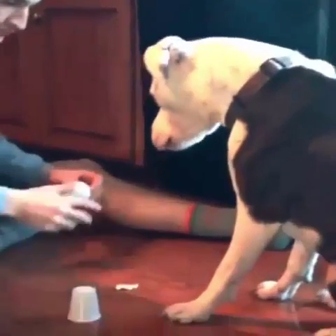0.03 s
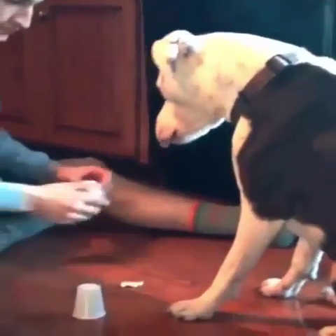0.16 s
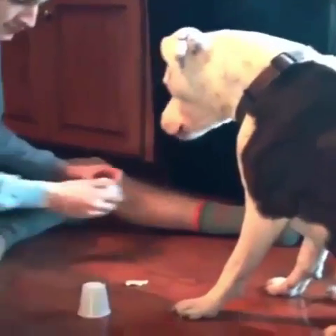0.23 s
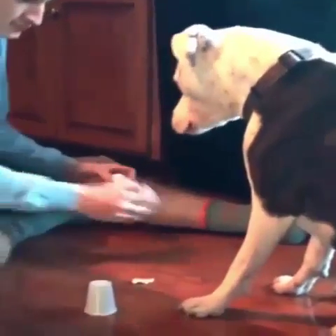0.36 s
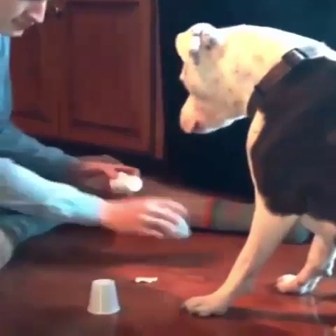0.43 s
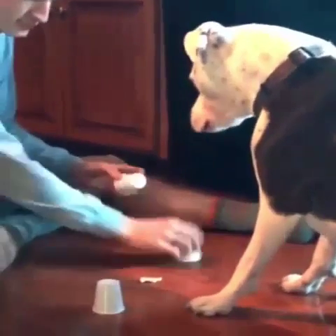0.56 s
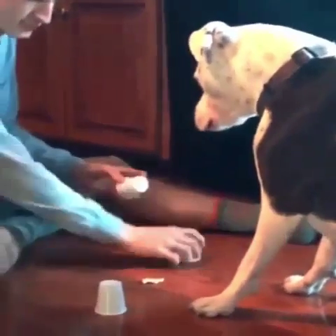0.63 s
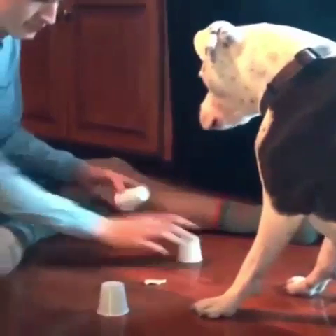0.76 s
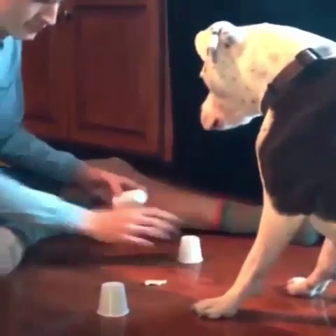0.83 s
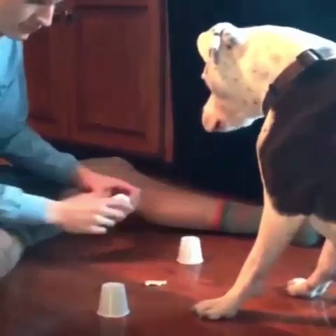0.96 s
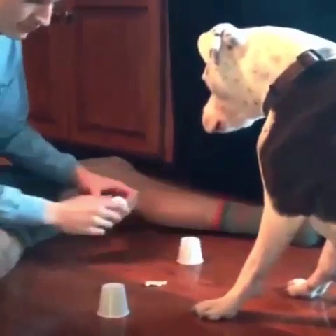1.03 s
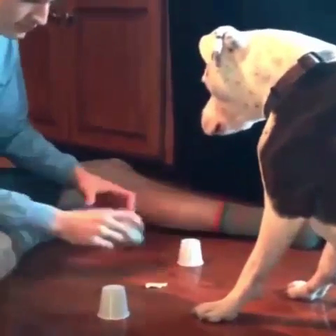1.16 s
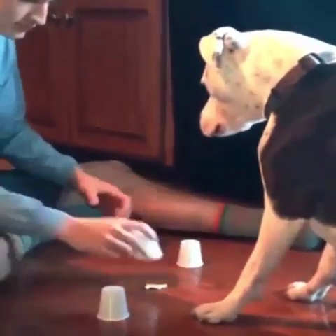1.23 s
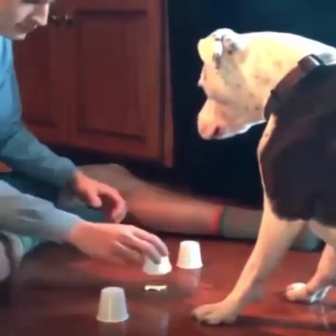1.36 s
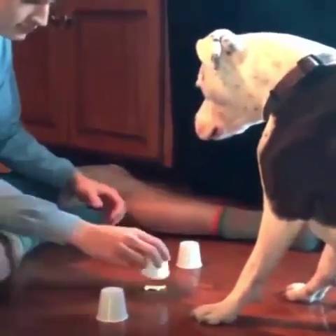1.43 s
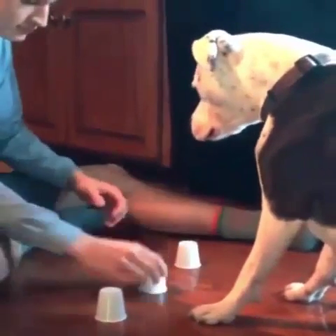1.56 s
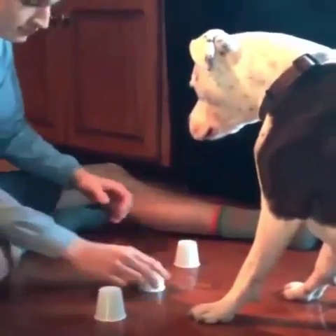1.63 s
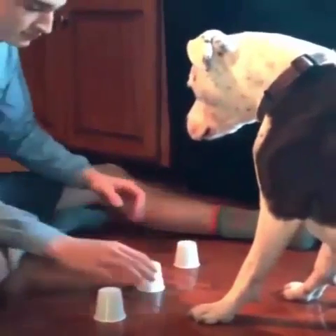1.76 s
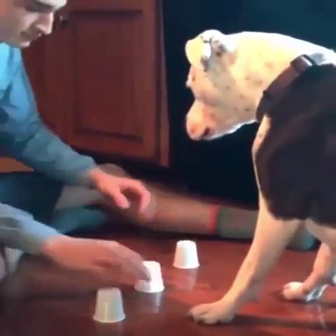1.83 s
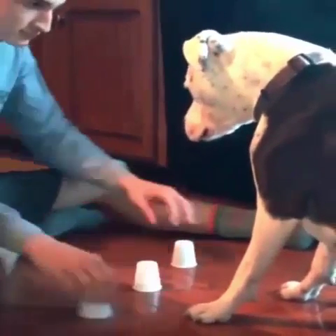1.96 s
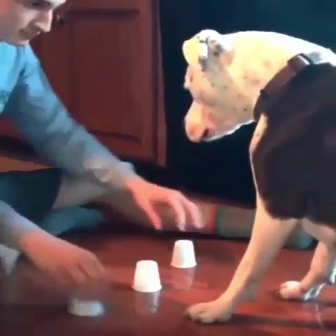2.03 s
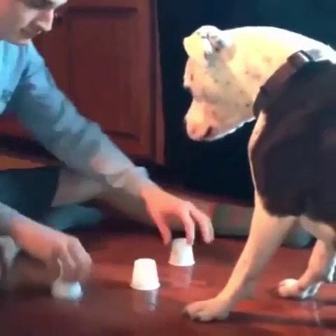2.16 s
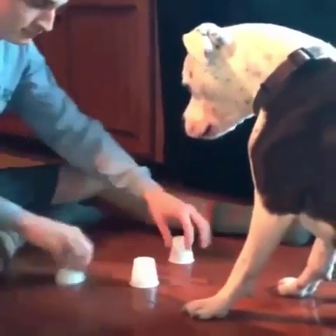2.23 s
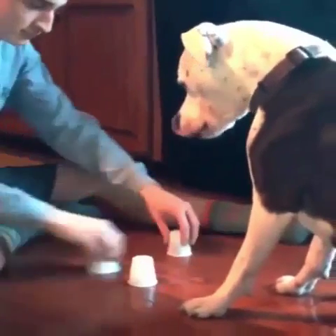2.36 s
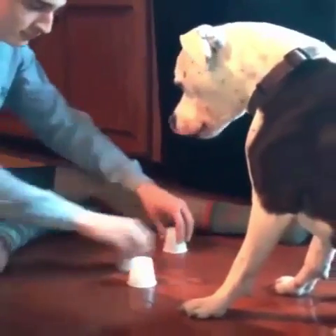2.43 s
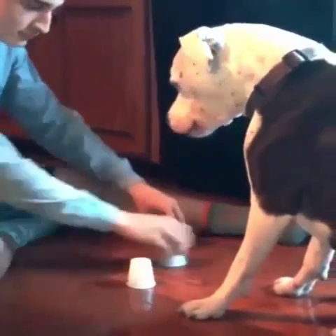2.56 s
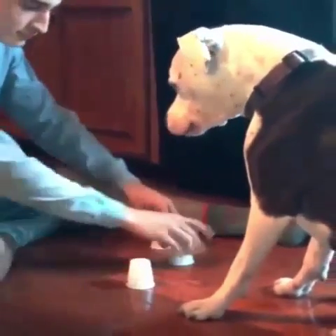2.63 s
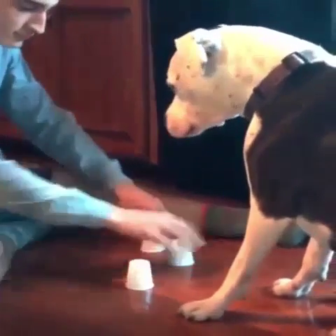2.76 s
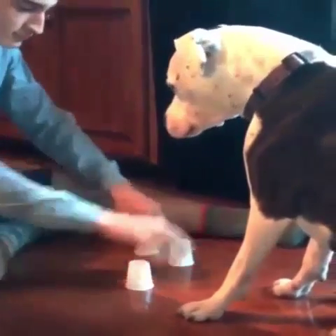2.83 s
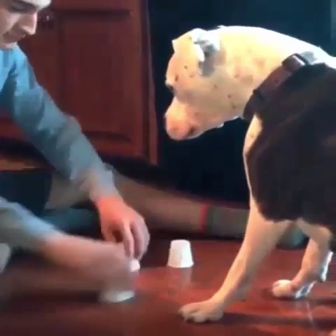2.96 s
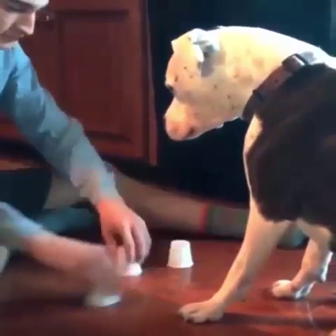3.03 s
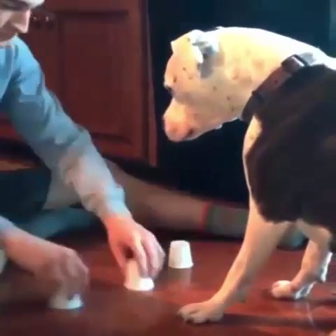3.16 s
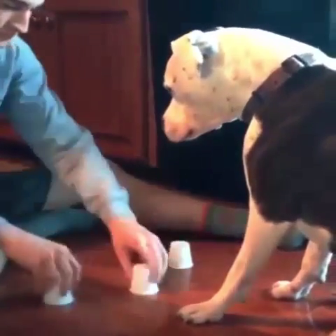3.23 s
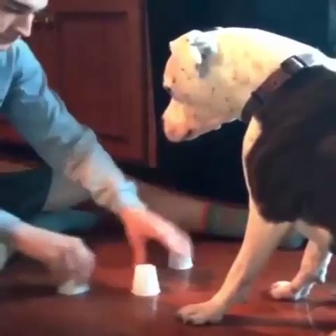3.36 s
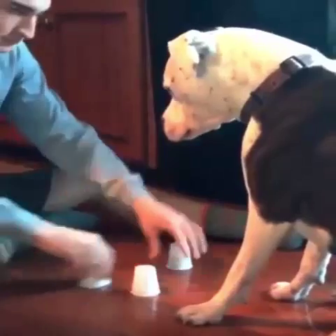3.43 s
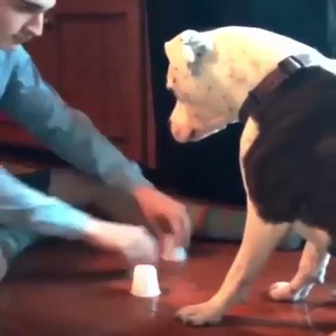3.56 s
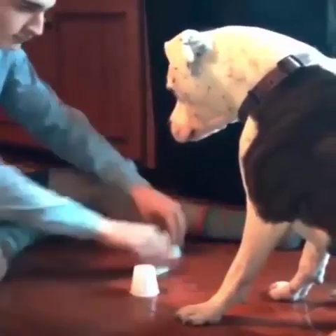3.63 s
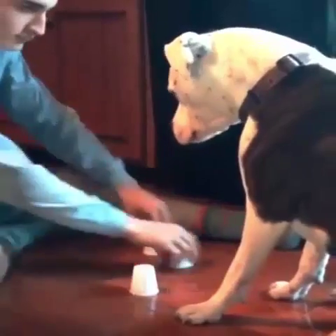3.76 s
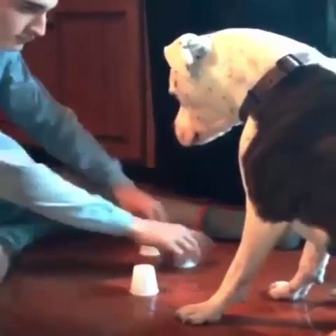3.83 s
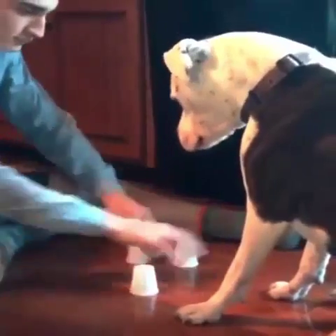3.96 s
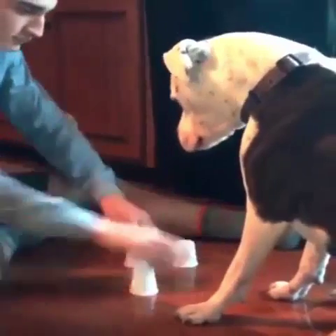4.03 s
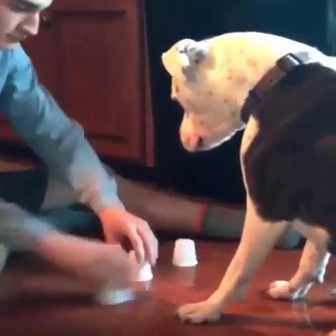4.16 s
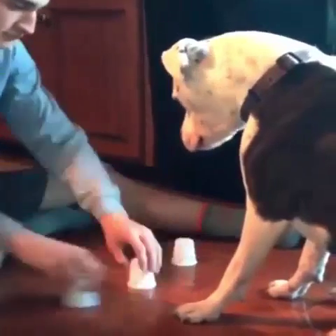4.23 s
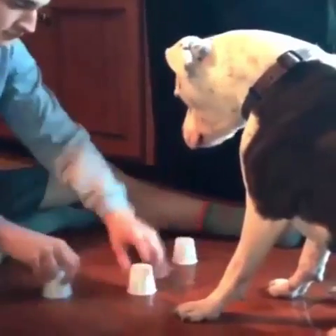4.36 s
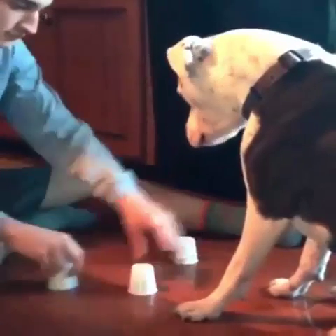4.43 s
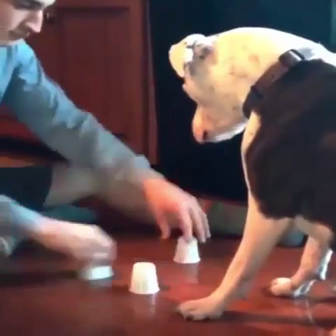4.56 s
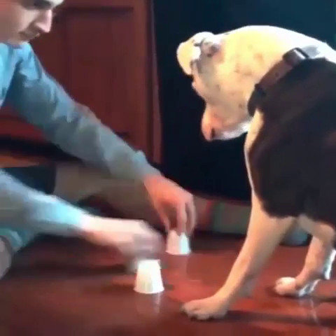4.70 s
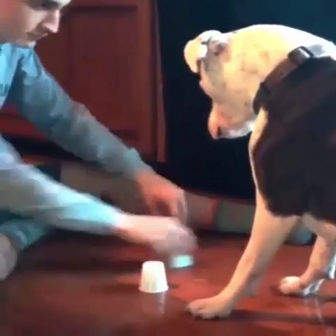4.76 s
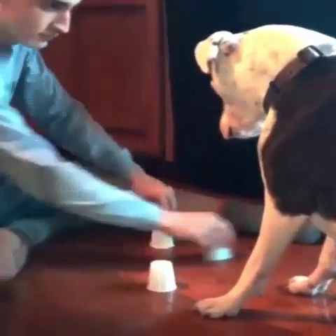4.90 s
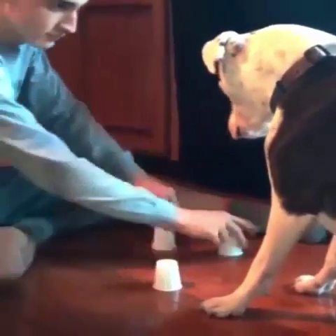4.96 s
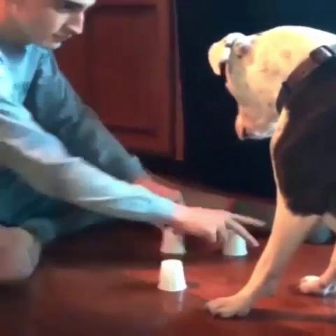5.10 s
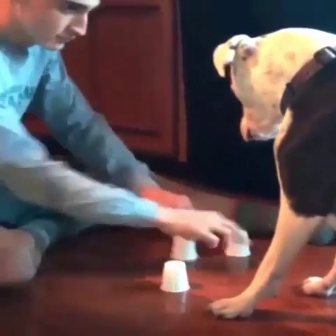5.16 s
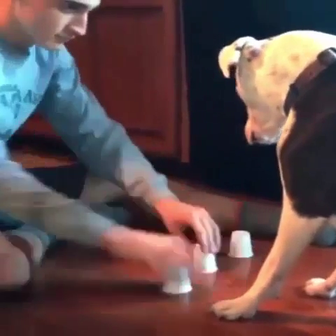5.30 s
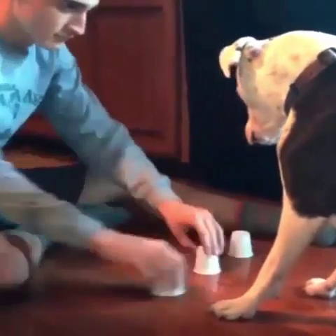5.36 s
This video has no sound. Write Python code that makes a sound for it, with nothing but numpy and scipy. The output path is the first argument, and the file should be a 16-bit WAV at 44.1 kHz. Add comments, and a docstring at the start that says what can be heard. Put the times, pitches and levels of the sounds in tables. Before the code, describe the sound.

Soft sleeve and finger rustles open over a faint hum and hiss in a kitchen with a short echo. At about 0.7 seconds a small plastic cup lands upside down on a hardwood floor with a hollow clack and rattles quickly to rest. Another lands the same way at 1.6 seconds. From 2 seconds the cups are shuffled by hand: quick, gritty scrapes swell and fade one after another, mixed with light, irregular rim knocks that ring briefly. A tipping cup gives a tiny hoot at about 2.2 and 2.6 seconds, the second together with a third rattling landing. The knocks bunch up around 3.6 and 4.1 seconds, and the sliding and tapping continue until about 5.4 seconds. The sound cuts out completely for about a tenth of a second near 0.6, 1.8, 3.1 and 4.3 seconds.

```python
"""Small plastic cups are set upside down on a hardwood floor, then shuffled about by hand. Each rim lands with
a chattering clack, and the cup wall and the air inside ring briefly after it. Pushed along, the rims stick and
slip on the grain in a gritty scrape; twice a tipping cup hoots. The sound opens on the fading tail of an
earlier one; sleeves and fingers rustle, and a kitchen adds its short echo. A faint hum and hiss lie underneath;
four times the sound cuts out altogether."""
import sys
import numpy as np
from scipy import signal
from scipy.fft import rfft, irfft, next_fast_len
from scipy.io import wavfile
from scipy.ndimage import uniform_filter1d

SR = 44100
rng = np.random.default_rng(int(sys.argv[2]) if len(sys.argv) > 2 else 0)


def persist_wave(psi):
    """Save psi, clipped to +-1, as 16-bit WAV."""
    counts = np.round(np.clip(psi, -1, 1) * 32767).astype(np.int16)
    wavfile.write(sys.argv[1], SR, np.atleast_2d(counts).T)


N = 238845
T = np.arange(N) / SR

# EQ curve of the room's hiss: (frequency [Hz], gain [dB])
HISS_EQ = [(25, -39.5), (55, -9), (115, -4), (180, -6.5), (350, 0.5), (460, -10.5), (620, -9), (750, -14),
           (1500, -17.5), (2800, -18.5), (5000, -16.5), (8000, -17), (11800, -19), (12500, -31.5)]
# partials of an appliance's hum: (frequency [Hz], rms level [dB])
HUM_PARTIALS = [(323.0, -76.5), (393.0, -65), (1093, -77.5), (1814, -85.5)]
# the fading tail of an earlier sound at the start, then sleeve and finger sounds: (time [s], level before trim
# [dB], length [s], centre [Hz], width [Hz])
SWELLS = [(-.04, -45.5, 0.088, 1290, 895), (-.03, -59.5, 0.16, 3500, 3450),
          (0.232, -52.5, .18, 6260, 7150), (0.573, -51.5, 0.011, 1070, 2140),
          (1.024, -52, 0.033, 604, 108), (1.017, -60, 0.037, 6030, 8000), (1.323, -61, 0.017, 630, 109)]
# decay of the kitchen's reverb: (frequency [Hz], t60 [s])
KITCHEN_DECAY = [(150, 0.35), (500, 0.28), (1500, 0.3), (4000, 0.29), (8000, 0.28), (14000, 0.45)]
# hard mutes: (start [s], end [s])
DROPOUTS = [(.592, .685), (1.83, 1.914), (3.047, 3.146), (4.3, 4.4)]
# a cup lands and rattles to rest; thud to hollow are relative to the level, before trims:
# (time [s], level [dB], thud [dB], treble [dB], wall ring [dB], hollow [dB],
# hollow note on the landing side [Hz], on the far side [Hz], settling time [s], fade over it [dB])
SET_DOWNS = [(0.687, -9.5, 0.5, 6.2, -13, 1.3, 1532, 953, 0.095, -17),
             (1.6007, -9.5, -4, 0.73, -1.5, 0.23, 562, 1101, .11, -21),
             (2.555, -11.5, -1, 10.9, -24.5, 0.11, 924, 1000, .095, -21.5)]
# single rim knocks in the shuffle; thud to hollow are relative to the level, before trims:
# (time [s], level [dB], thud [dB], treble [dB], wall ring [dB], hollow [dB], hollow note [Hz])
RIM_KNOCKS = [(2.064, -35.5, -16, -12, -15, 13.5, 1960), (2.087, -18, -8, 11, -15, -1.5, 920),
              (2.189, -26, 5, -8, -12, 5, 1950), (2.247, -17.5, -15, -3, -17, -12, 910),
              (2.719, -38.5, -2, -3, -15, 9, 875), (2.884, -44, -12, 8, 6, 8, 1970),
              (2.9502, -21.5, -19, 5.5, 12, 4.5, 632), (2.991, -19, 12, 13, -31, -3, 633),
              (3.168, -20.5, -2, 0, 4, -9, 965), (3.221, -23.5, 13, 35, -12, -2, 1010),
              (3.274, -31, 8, -2, 11, 11.5, 650), (3.374, -22.5, -3, 3, -21, -21, 1590),
              (3.591, -21, -1.5, -7, 0.5, -2, 910), (3.615, -19, 2, 0, -12, 2.5, 877),
              (3.708, -14.5, 11, -5, -7, -6, 597), (3.752, -22, 8, 0, 5.5, 1.5, 365),
              (4.041, -30, -3, -8, -4, 8, 923), (4.092, -15, -20, -10, -21, 5.5, 866),
              (4.102, -27, -5, -5, -7, 12.5, 2740), (4.131, -22.5, -6, 17, -18, -15, 1170),
              (4.14, -16, 1, 0, -14.5, 6.5, 917), (4.157, -18.5, 3.5, -10, -1, -0.5, 2750),
              (4.172, -19.5, 10, 14, -12, -9, 2660), (4.211, -17.5, 7, -18, -26, -2, 634),
              (4.288, -30, -10, 0, -11, 9.5, 1423), (4.468, -29.5, -7, -4, -12, 9, 1104),
              (4.49, -24.5, 3, -13, -20, -4, 1100), (4.706, -19.5, -3, -6.5, 0.5, 1, 1500),
              (4.724, -25.5, 17, -16, -10, 6, 1330), (4.813, -23, 7.5, -21, -15, 7.5, 487),
              (4.844, -14.5, -8, 0.5, -19, 1.5, 733), (4.953, -21, 4, 0.5, -9, -14, 980),
              (5.088, -33, 18, 10, -15, 2, 595), (5.179, -15.5, 1, -6.5, -12, -4, 996),
              (5.232, -29.5, 15, -15, -3, 11, 1550), (5.368, -25, -1, 4, -22, -19, 1430)]
# EQ curve of a clack: (frequency [Hz], gain [dB])
CLACK_EQ = [(30, -23), (90, -28), (170, -15.5), (270, -10), (400, -1.5), (600, 1.5), (1100, 1.5),
            (1700, 1.5), (2500, -4.5), (3400, -5.5), (4600, -13), (7500, -17), (11000, -24.5),
            (13000, -34.5)]
# resonances and dead spots of a rim on the boards: (centre [Hz], width [Hz], gain [dB])
BOARD_BANDS = [(366, 99, 8), (446, 163, -6.5), (632, 110, 0.5), (864, 11, 2), (1010, 38, -1),
               (1440, 44, 1.5), (2690, 100, 1), (2810, 53, -4.5), (3670, 130, 1), (6450, 290, 3)]
# modes of the cup wall: (frequency [Hz], level [dB], t60 [s])
CUP_MODES = [(1788.3, 1, 0.092), (2250, -38, .03), (3075, -11.5, 0.075), (3693, -12, 0.047),
             (4270, -30, 0.027), (4600, -25, 0.092), (6760, -26.5, 0.045), (6700, -22, 0.033)]
# cups creep under the hands between pushes; the last three are relative to the scrape, all before trims:
# (start [s], end [s], scrape [dB], rumble [dB], fizz [dB], wall ring [dB])
CREEP = (2, 5.6, -55.5, -3, -4, -15)
# a hand pushes a cup along, levels as in CREEP:
# (time of top speed [s], rise [s], fall [s], scrape [dB], rumble [dB], fizz [dB], wall ring [dB])
PUSHES = [(2.085, 0.031, 0.042, -27.5, -17, -11, -2), (2.243, 0.11, 0.14, -27, -16, -8, -27),
          (2.41, 0.11, 0.11, -33, -15, -6.5, -14), (2.604, 0.15, 0.063, -27, -11, -11, -10),
          (2.915, 0.069, 0.083, -41, -15, -9, 1), (2.99, 0.087, 0.058, -30.5, -13.5, -5, 5.5),
          (3.168, 0.085, 0.09, -32.5, -13, -6, 3.5), (3.265, 0.09, 0.17, -36, -8, -6, -1.5),
          (3.399, 0.065, 0.05, -33.5, -11.5, -10.5, -20), (3.46, 0.098, .08, -55, -17, 7, -18.5),
          (3.555, 0.098, 0.069, -36, -19, -7.5, -9), (3.624, 0.097, 0.097, -34, -12, -8, -2),
          (3.767, 0.096, 0.035, -29, -13, -9, 4), (3.865, 0.032, 0.027, -53.5, 7, -14, -9),
          (4.105, 0.085, 0.081, -29, -10, -10, -7), (4.195, 0.087, 0.19, -37.5, -12, -1.5, -13),
          (4.4, 0.046, 0.078, -34.5, -12, -5.5, -18), (4.474, 0.11, 0.13, -40, -8, -3.5, -18),
          (4.665, 0.11, .07, -44, -13, 0, -13), (4.735, 0.1, 0.095, -31, -7, -10, -16),
          (4.849, 0.092, 0.039, -32.5, -5.5, -9, -20), (4.945, 0.058, 0.045, -44, 1.5, 5.5, -2),
          (5.242, 0.13, 0.1, -41, 3, -4.5, -12), (5.325, 0.036, 0.059, -49, -16, -5, 10),
          (5.385, 0.043, 0.033, -38.5, -15, -2, -13)]
# how steeply each slide layer grows with speed: (scrape, rumble, fizz, wall ring) [exponents]
SPEED_POWERS = (3.1, 2.3, 1.8, 2.7)
# EQ curve of a scrape: (frequency [Hz], gain [dB])
SCRAPE_EQ = [(30, -31), (110, -21.5), (260, -8.5), (450, -5), (700, 5), (1400, 6), (2200, 7.5),
             (3400, -2.5), (4300, -4.5), (5900, -3.5), (6500, -1), (7400, -4), (11800, -8), (12300, -20)]
# air hoots under a tipping cup: (time [s], length [s], level before trim [dB], from [Hz], to [Hz])
HOOTS = [(2.225, 0.0783, -29, 977, 711), (2.571, 0.046, -29.5, 941, 1010)]


def amp(db):
    """Decibels to gain."""
    return 10 ** (np.asarray(db) / 20)


def unit(x):
    """Normalises to an rms of 1."""
    return x / np.sqrt(np.mean(x ** 2) + 1e-20)


def curve_at(points, hz):
    """Reads a curve on a log-frequency axis."""
    f, value = np.transpose(points)
    return np.interp(np.log(hz + 1), np.log(f + 1), value)


def add(mix, time_s, sound):
    """Drops a sound into the mix at time_s."""
    start = round(time_s * SR)
    sound = sound[max(-start, 0):]
    part = mix[max(start, 0):][:len(sound)]
    part += sound[:len(part)]


def eq(x, db_at, size=4096):
    """Minimum-phase EQ whose gain in dB is db_at(Hz)."""
    hz = abs(np.fft.fftfreq(size, 1 / SR))
    log_gain = np.log(amp(np.maximum(db_at(hz), -100)))
    taps = np.fft.ifft(np.exp(np.conj(signal.hilbert(log_gain)))).real
    return signal.fftconvolve(x, taps[:size // 2])[:len(x)]


def pass_filter(x, kind, hz, order=4):
    """Low-, band- or high-pass."""
    return signal.sosfilt(signal.butter(order, hz, kind, fs=SR, output="sos"), x)


def drift(rate_hz):
    """Smooth random modulator of rms 1."""
    size = next_fast_len(N)
    rolloff = np.exp(-(np.fft.rfftfreq(size, 1 / SR) / rate_hz) ** 2)
    return unit(irfft(rfft(rng.standard_normal(size)) * rolloff, size)[:N])


def room_tone(hiss_db=-59.5, waver_hz=5, waver_rate_hz=12):
    """The bed: steady hiss and the slightly wavering hum of an appliance."""
    bed = amp(hiss_db) * unit(eq(rng.standard_normal(N), lambda hz: curve_at(HISS_EQ, hz)))
    for centre_hz, db in HUM_PARTIALS:
        pitch_hz = centre_hz + waver_hz * drift(waver_rate_hz)
        bed += amp(db) * np.sqrt(2) * np.sin(2 * np.pi * np.cumsum(pitch_hz) / SR)
    return bed


def soft_swells(trim_db=-1):
    """The fading tail of an earlier sound, then sleeves and fingers brushing, in short, soft swells of band-
    passed noise."""
    out = np.zeros(N)
    for time_s, db, length_s, centre, width in SWELLS:
        noise = rng.standard_normal(SR)
        brush = eq(noise, lambda hz: -10 * np.log10(1 + (2 * (hz - centre) / width) ** 4))
        swell = np.hanning(int(length_s * SR))
        add(out, time_s, amp(db + trim_db) * unit(brush)[:len(swell)] * swell)
    return out


def reverb_tail(predelay_s=0.00086, build_s=0.0014, echoes_per_s=8000):
    """Dense reflections off floor, cabinets and walls; the lows and the very top hang on longest."""
    t = np.arange(SR) / SR
    echoes = rng.choice([-1., 1.], SR) * (rng.random(SR) < echoes_per_s / SR)
    hz, age_s, spectrum = signal.stft(echoes, SR, nperseg=256)
    decay = amp(-60 * age_s / curve_at(KITCHEN_DECAY, hz)[:, None])
    tail = signal.istft(spectrum * decay, SR, nperseg=256)[1][:SR]
    tail *= np.clip((t - predelay_s) / build_s, 0, 1)
    return tail / np.linalg.norm(tail)


def kitchen(x, wet_db=-1, cycle_hz=7, tails=4):
    """As hands and cups move, their sound crossfades from one pattern of reflections to the next."""
    turn = (cycle_hz * tails * T - np.arange(tails)[:, None]) % tails
    sends = np.sin(np.pi / 2 * np.minimum(turn, 2))  # equal-power crossfades
    wet = sum(signal.oaconvolve(x * send, reverb_tail())[:N] for send in sends)
    return x + amp(wet_db) * wet


def set_down_hits(rebound_db=-6, slowing=1.5, hollower_db=10, duller_db=-4, rebounds=7):
    """A landing cup rocks side to side, ever slower, softer, duller and hollower; rows as RIM_KNOCKS."""
    hits = []
    for time_s, db, thud, treble, ring, hollow, near_hz, far_hz, settle_s, fade_db in SET_DOWNS:
        for k in range(rebounds + 1):
            settled = (k / rebounds) ** slowing
            level = db + rebound_db * (k > 0) + fade_db * settled
            note_hz = far_hz if k % 2 else near_hz
            hits.append((time_s + settle_s * settled, level, thud, treble + duller_db * settled,
                         ring, hollow + hollower_db * settled, note_hz))
    return hits


def boards_db(hz):
    """The peaks and notches that rim and floorboards stamp on every contact."""
    return sum(db / (1 + (2 * (hz - centre) / width) ** 2) for centre, width, db in BOARD_BANDS)


def cup_ring(pitch_ratio=1, size=8192):
    """The wall of a struck cup rings in fast-dying modes."""
    t = np.arange(size) / SR
    return sum(amp(db - 60 * t / t60) * np.sin(2 * np.pi * hz * pitch_ratio * t)
               for hz, db, t60 in CUP_MODES)


def rim_hits(hits, ring_trim_db=-7, hollow_trim_db=-6, chatter_t60=0.05, hollow_t60=0.05, size=8192):
    """A rim chatters on the boards in a short clack; the cup wall and its hollow note ring with it."""
    clacks, rings = np.zeros(N), np.zeros(N)
    t = np.arange(size) / SR
    attack = 1 - np.exp(-t / 0.00084)  # a light rim never lands flat
    for time_s, db, thud, treble, ring, hollow, hollow_hz in hits:
        chatter = rng.choice([-1., 1.], size) * attack * amp(-60 * t / chatter_t60)
        hardness = [(420, thud), (1500, 0), (6000, treble)]  # (frequency [Hz], gain [dB])
        clack = eq(chatter, lambda hz: curve_at(CLACK_EQ, hz) + boards_db(hz) + curve_at(hardness, hz))
        clack *= np.sqrt(SR / 1000) / np.linalg.norm(clack)  # the energy of 1 ms at full scale
        add(clacks, time_s, amp(db) * clack)
        # the grip detunes the wall a little; grip and gap under the rim set the hollow note
        wall = cup_ring(1 + 0.0013 * rng.standard_normal())
        note = np.sin(2 * np.pi * hollow_hz * t) * amp(-60 * t / hollow_t60)
        body = amp(ring + ring_trim_db) * wall + amp(hollow + hollow_trim_db) * note
        add(rings, time_s, amp(db) * attack * body)
    return clacks + pass_filter(rings, "high", 330, order=2)  # the ringing is kept out of the low end


def travelling_contact(x, depth_db=4.5, size=512):
    """The contact point travels round the rim, so resonances come and go in short patches."""
    frames = dict(nperseg=size, noverlap=size * 3 // 4)
    spectrum = signal.stft(x, **frames)[2]
    patches = uniform_filter1d(rng.standard_normal(spectrum.shape), size=3, axis=0)  # across frequency
    patches = unit(uniform_filter1d(patches, size=9, axis=1))  # across time
    return signal.istft(spectrum * amp(depth_db * patches), **frames)[1][:N]


def slide_envelope(layer):
    """A layer (0 scrape, 1 rumble, 2 fizz, 3 ring) swells with each push's speed, over a steady creep."""
    start, end, db, *offsets = CREEP
    power = amp(db + [0, *offsets][layer]) ** 2 * ((T > start) & (T < end))
    for peak_s, rise_s, fall_s, db, *offsets in PUSHES:
        ramp = np.interp(T, [peak_s - rise_s, peak_s, peak_s + fall_s], [0, 1, 0])
        speed = np.sin(np.pi / 2 * ramp)
        power += (amp(db + [0, *offsets][layer]) * speed ** SPEED_POWERS[layer]) ** 2
    return np.sqrt(power)


def slides(slips_per_s=1600, grit=0.73, jerk_db=2, jerk_hz=60, wobble_s=0.00009, wobble_hz=40):
    """The rim sticks and slips on the wood grain; the tiny slips drive the boards and the cup wall."""
    slips = (rng.random(N) < slips_per_s / SR) * rng.choice([-1., 1.], N)
    slips *= amp(-0.5 * np.minimum(rng.exponential(1, N), 3))  # slightly uneven in strength
    friction = (unit(slips) + grit * rng.standard_normal(N)) * amp(jerk_db * drift(jerk_hz))
    rub = eq(friction, lambda hz: curve_at(SCRAPE_EQ, hz) + boards_db(hz))
    rumble = pass_filter(rub, "low", 520)
    scrape = travelling_contact(pass_filter(rub, "band", [520, 4000]))
    fizz = pass_filter(rub, "high", 4000)
    wall = signal.fftconvolve(friction, cup_ring())[:N]
    ring = np.interp(T + wobble_s * drift(wobble_hz), T, wall)  # fingers flex the wall: pitch wobbles
    layers = [(scrape, -4), (rumble, -4), (fizz, -3.5), (ring, -9)]  # (sound, trim [dB])
    return sum(amp(db) * unit(sound) * slide_envelope(k) for k, (sound, db) in enumerate(layers))


def hoots(trim_db=-1, width_hz=35):
    """Friction noise in a narrow air resonance that glides as the gap under the rim changes."""
    out = np.zeros(N)
    for time_s, length_s, db, from_hz, to_hz in HOOTS:
        size = int(length_s * SR)
        glide = np.exp(2j * np.pi * np.cumsum(np.linspace(from_hz, to_hz, size)) / SR)
        flutter = (drift(width_hz) + 1j * drift(width_hz))[:size]
        add(out, time_s, amp(db + trim_db) * unit((flutter * glide).real) * np.hanning(size))
    return out


def scene():
    """Cups and hands through the kitchen's reverb, over the room tone, in mono."""
    bed = room_tone()
    foley = slides() + hoots() + soft_swells() + rim_hits(list(RIM_KNOCKS) + set_down_hits())
    return (bed + kitchen(foley))[None]


def record(dry, ceiling=0.68, top_hz=15900):
    """Soft-clips the peaks, mutes the dropouts and cuts off the extreme top."""
    gate = np.ones(N)
    for start, end in DROPOUTS:
        gate[(T > start) & (T < end)] = 0
    gate = uniform_filter1d(gate, size=90)  # 2 ms fades
    clipped = ceiling * np.tanh(dry / ceiling)
    low_pass = signal.firwin(511, top_hz, window=("kaiser", 9), fs=SR)
    return signal.oaconvolve(clipped * gate, low_pass[None], "same")


dry = scene()
out = record(dry)
persist_wave(out)
```